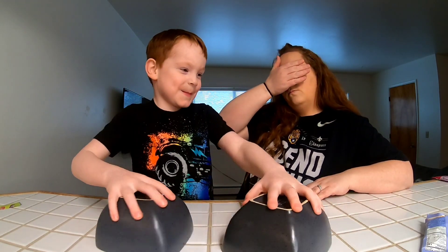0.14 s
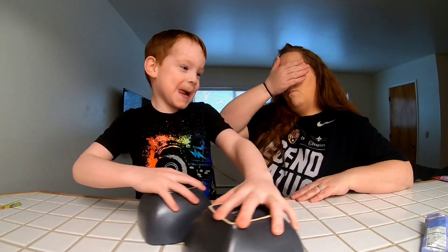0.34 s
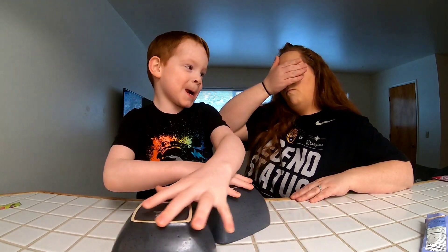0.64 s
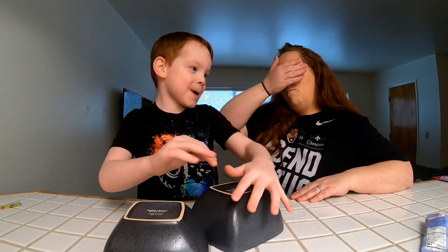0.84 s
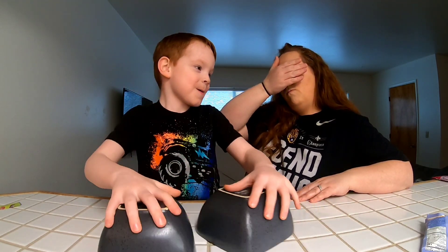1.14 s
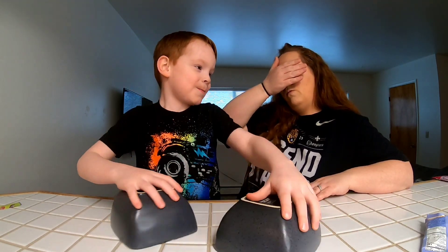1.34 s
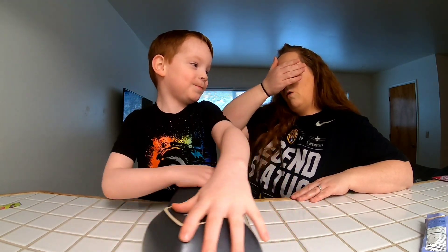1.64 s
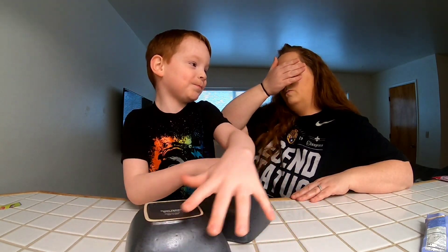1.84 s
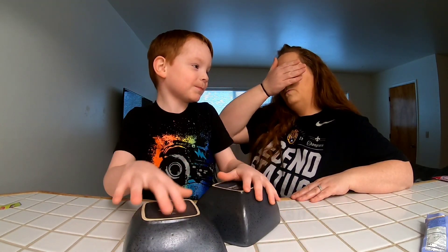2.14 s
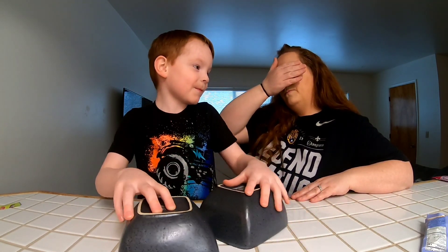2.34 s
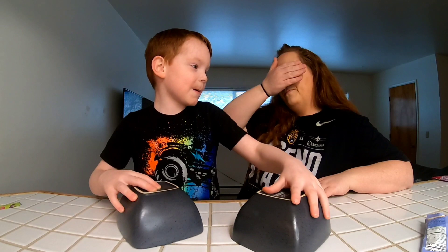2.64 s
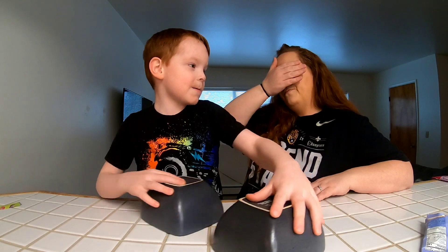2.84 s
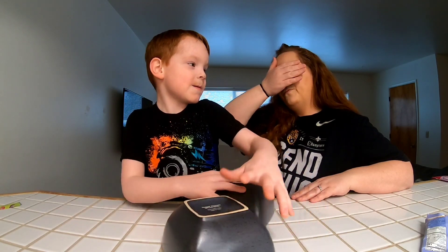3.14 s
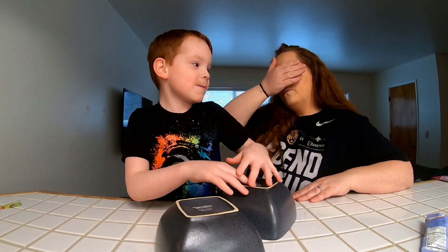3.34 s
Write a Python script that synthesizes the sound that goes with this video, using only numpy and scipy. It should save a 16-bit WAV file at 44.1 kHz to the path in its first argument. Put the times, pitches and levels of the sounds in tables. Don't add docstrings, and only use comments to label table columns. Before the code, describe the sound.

Close view of ceramic bowls pushed rim-down across tile: a quick first shuffle, then two longer ones, gritty scraping mixed with irregular hollow knocks and dull counter thuds, in a lively, quiet kitchen.

```python
import sys
import numpy as np
from scipy import signal
from scipy.io import wavfile
from scipy.ndimage import uniform_filter1d

SR = 44100
rng = np.random.default_rng(int(sys.argv[2]) if len(sys.argv) > 2 else 0)


def store_pcm(level_fs):
    pcm = np.round(np.clip(level_fs, -1, 1) * 32767).astype(np.int16)
    wavfile.write(sys.argv[1], SR, np.atleast_2d(pcm).T)


def field_ratio(decibels):
    return 10 ** (np.asarray(decibels, dtype=float) / 20)


N = 154350

BOWL_ONE_HZ = [1485, 1510, 2590, 4490, 5595, 7023, 8310, 10190, 6655, 3920, 8730]
BOWL_TWO_HZ = [1575, 1605, 2736, 3443, 4760, 5790, 5884, 7219, 8909, 9948, 10640]
COUNTER_HZ = [70, 129, 165, 203]
# level in dB, time to die by 60 dB in seconds.
BOWL_ONE = [(4.5, 0.25), (-3.5, 0.22), (2, 0.15), (-12.5, 0.28), (-12, 0.18), (-17.5, 0.17), (-22.5, 0.32),
            (-15.5, 0.15), (-12, 0.042), (-11.5, .1), (-25, .2)]
BOWL_TWO = [(6.5, 0.2), (-8, 0.27), (6, 0.17), (-4.5, 0.22), (-12, 0.22), (-18.5, 0.21), (-21.5, 0.23),
            (-21, 0.21), (-21, 0.19), (-15, 0.13), (-13.5, 0.16)]
COUNTER = [(-8, 0.31), (-4.5, 0.25), (-6, 0.4), (-6, 0.47)]
# pitch in Hz, level in dB, time to die by 60 dB in seconds.
AIR = [(283.4, -2.5, 0.21), (329, 2, 0.075), (360, 0.5, 0.1), (393, 1.5, 0.11), (425, 5.5, 0.11),
       (470, 3.5, 0.063), (554, -6.5, 0.14)]
# frequency in Hz, level in dB.
RIM_TONE = [(60, -15), (250, -2.5), (500, 2), (1200, 6), (2500, -1.5), (4500, -15), (9000, -33),
            (16000, -27.5)]
# time in seconds, then knock, hollow air, ring and bell tone in dB.
KNOCKS_ONE = [(0.423, -9, -14, -32.5, -23.5), (0.5056, -10, -20.5, -31, -35.5),
              (0.5725, -10.5, -23.5, -26, -21), (0.6036, -7, -17.5, -28, -18),
              (0.642, -11, -20.5, -26, -20), (0.6811, -15, -22, -42, -28), (0.7138, -13.5, -21, -47, -49),
              (1.0942, -13, -18, -39, -60), (1.1655, -17, -26, -36, -61), (1.2446, -35, -37, -37, -48),
              (1.2719, -15, -33, -39, -45), (1.279, -8.5, -20.5, -29.5, -37),
              (1.3007, -20.5, -24.5, -39, -43), (1.335, -18, -27, -35, -48), (1.3549, -8, -27, -34, -41),
              (1.3625, -10, -27, -27, -36), (1.3994, -5, -32, -33, -53), (1.4175, -25, -24, -32, -45),
              (1.5066, -6, -23.5, -34, -62), (1.5452, -5.5, -14, -29.5, -33),
              (1.6215, -11, -13, -36.5, -49), (1.627, -10, -22.5, -41, -48), (1.9933, -11, -19, -36, -55),
              (1.9994, -10, -35, -43, -52), (2.011, -14.5, -20, -45, -31.5), (2.3005, -18, -30.5, -51, -60),
              (2.503, -23.5, -28, -45, -63), (2.5082, -16, -18, -38, -38), (2.552, -8, -19.5, -31, -58),
              (3.048, -7.5, -27, -28, -23)]
# time in seconds, then knock, hollow air and ring in dB.
KNOCKS_TWO = [(0.1403, -6, -19.5, -40), (0.2844, -7.5, -27, -37), (0.3114, -11.5, -33, -45),
              (0.3729, -5.5, -15.5, -34), (0.3914, -14.5, -22.5, -25.5), (0.864, -7.5, -25, -36),
              (0.9044, -11.5, -24, -47), (0.9611, -33.5, -33.5, -49), (1.4859, -13, -21.5, -42.5),
              (1.6814, -12.5, -17, -36), (1.726, -14, -26.5, -45.5), (1.7857, -14, -37, -37),
              (1.8186, -15.5, -21, -60), (1.878, -19.5, -32, -46), (1.906, -22, -34, -46),
              (1.9421, -13.5, -33, -57), (1.9653, -14.5, -29, -41), (2.4171, -15.5, -35, -52.5),
              (2.451, -30.5, -44, -71), (2.5842, -14, -26, -46), (2.627, -12, -21.5, -34),
              (2.643, -11, -17, -44), (2.6852, -9, -27, -33), (2.7882, -7.5, -17.5, -32.5),
              (2.796, -9, -18, -40), (2.9001, -19.5, -40, -35), (2.9135, -10, -17.5, -39),
              (3.0152, -13, -21, -41), (3.021, -14.5, -13.5, -41), (3.3039, -17.5, -17, -41),
              (3.3119, -13.5, -21, -38), (3.3662, -14, -23, -44.5), (3.4328, -35, -32, -52.5),
              (3.453, -44, -37.5, -63)]


def evened(x):
    return x / np.sqrt(np.mean(x ** 2) + 1e-20)


def read(points, hz):
    f, value = np.transpose(points)
    return np.interp(np.log(hz + 1), np.log(f + 1), value)


def colour(x, points):
    log_gain = np.log(field_ratio(read(points, abs(np.fft.fftfreq(4096, 1 / SR)))))
    taps = np.fft.ifft(np.exp(log_gain - 1j * signal.hilbert(log_gain).imag)).real[:2048]
    return signal.oaconvolve(x, taps / np.linalg.norm(taps))[:N]


def clicks(s, strength):
    out = np.zeros(N)
    out[np.round(s * SR).astype(int)] = strength
    return out


def pitched(hz, rows):
    return [(f, *row) for f, row in zip(hz, rows)]


def mode(x, hz, db, t60):
    r = np.exp(-np.log(1000) / (max(t60, 0.01) * SR))
    w = 2 * np.pi * hz / SR
    return field_ratio(db) / 2 * signal.lfilter([1, 0, -1], [1, -2 * r * np.cos(w), r * r], x)


def struck(s, db, modes, spread_db):
    luck = rng.standard_normal((len(s), len(modes), 2))
    out = np.zeros(N)
    for k, row in enumerate(modes):
        strength = field_ratio(db[k] + spread_db * luck[:, k, 0]) * np.sign(luck[:, k, 1])
        out += mode(clicks(s, strength), *row)
    return out


def ringing(s, db, modes):
    spread_db, bloom_s, wobble_db, wobble_rad = 1.5, 0.0017, 4.5, 0.83
    luck = rng.standard_normal((len(s), len(modes)))
    out, t = np.zeros(N), np.arange(N) / SR
    for k, (hz, mode_db, t60) in enumerate(modes):
        energy = clicks(s, field_ratio(2 * (db + mode_db + spread_db * luck[:, k])))
        decay = np.exp(-2 * np.log(1000) / (max(t60, 0.01) * SR))
        energy = signal.lfilter([1], [1, -decay], energy)
        energy = abs(uniform_filter1d(energy, round(bloom_s * SR) + 1))
        wobble = np.interp(t, np.arange(0, 4, 0.01), rng.standard_normal(400))
        wave = np.sin(2 * np.pi * hz * t + wobble_rad * wobble)
        out += np.sqrt(energy) * field_ratio(wobble_db * wobble) * wave
    return out


def tuned(t, hz):
    # time in seconds, pitch in Hz.
    cavity = [(.1, 420), (.3, 360), (.45, 422), (.58, 354), (.7, 282), (.9, 350), (1.1, 412), (1.3, 334),
              (1.5, 306), (1.65, 320), (1.8, 378), (2.0, 337), (2.5, 425), (2.65, 318), (2.95, 330),
              (3.06, 422), (3.25, 335), (3.42, 390)]
    width_hz, depth_db = 51.4, -7.5
    distance = (hz - np.interp(t, *np.transpose(cavity))) / width_hz
    return depth_db * (1 - np.exp(-distance ** 2))


def hush():
    # frequency in Hz, level in dB.
    hush_tone = [(30, -8), (150, -16.5), (500, -1), (2000, -15), (9000, -39.5)]
    level_db = -47
    mid, side = (evened(colour(v, hush_tone)) for v in rng.standard_normal((2, N)))
    return field_ratio(level_db) * np.array([mid + 0.3 * side, mid - 0.3 * side])


def rim_knocks(s, db):
    chatter_s, rise_s, tick_db = 0.0073, 0.00087, 17.5
    blows, t = clicks(s, field_ratio(db)), np.arange(4000) / SR
    swell = np.exp(-t / chatter_s) * (1 - np.exp(-t / rise_s))
    chatter = signal.oaconvolve(blows, swell)[:N] * rng.standard_normal(N)
    roughness_db = 2 * evened(uniform_filter1d(rng.standard_normal(N), size=60))
    return colour(chatter * field_ratio(roughness_db) + field_ratio(tick_db) * blows, RIM_TONE)


def counter_booms(s, hollow_db):
    # time in seconds, boom in dB, deep boom in dB.
    thumps = [(0.136, -25, -39), (0.428, -36, -53), (0.591, -20, -20), (0.873, -23.5, -28),
              (1.101, -44, -33), (1.389, -26, -26), (1.501, -26, -36), (1.545, -21, -35), (1.62, -32, -27),
              (1.757, -29, -21), (1.822, -32, -23), (1.997, -21, -26), (2.511, -41, -42), (2.644, -32, -28),
              (2.791, -17.5, -30), (3.02, -31, -34), (3.069, -16.5, -25), (3.15, -36, -29),
              (3.319, -39.5, -36)]
    knock_db, spread_db, slab_q = -17.5, 3.5, 2.76
    counter = pitched(COUNTER_HZ, COUNTER)
    slab = struck(s, [hollow_db + knock_db] * len(counter), counter, spread_db)
    thump_s, boom_db, deep_db = np.transpose(thumps)
    slab += struck(thump_s, [deep_db, boom_db], counter[:2], 0)
    return sum(signal.lfilter(*signal.iirpeak(hz, slab_q * hz / COUNTER_HZ[0], SR), slab) for hz in COUNTER_HZ)


def hollow_knocks(s, hollow_db):
    air_db, spread_db, contact_s = -5, 3.5, 0.0017
    air = struck(s, [hollow_db + air_db + tuned(s, row[0]) for row in AIR], AIR, spread_db)
    soft = np.hanning(round(contact_s * SR) + 3)
    return signal.oaconvolve(air + counter_booms(s, hollow_db), soft / soft.sum())[:N]


def glaze():
    level_db, t60 = -10, 0.11
    hz = np.sort(rng.uniform(9300, 15300, size=18))
    return [(f, level_db - 20 * np.log2(f / 10000), t60) for f in hz]


def bowl_rings():
    # time in seconds, level in dB.
    shrill_one = [(0.422, -26.5), (.506, -58), (.572, -30), (0.603, -20), (.642, -24.5), (0.713, -31),
                  (1.094, -47), (1.165, -51), (1.277, -33), (1.354, -40), (1.399, -29.5), (1.505, -33.5),
                  (1.547, -32.5), (1.625, -39), (2.011, -36), (2.3, -54), (2.552, -41), (3.047, -29)]
    shrill_two = [(.14, -36), (.285, -30), (.372, -26), (0.866, -29.5), (.905, -36), (1.681, -35),
                  (1.756, -43.5), (1.815, -41.5), (1.879, -47), (1.943, -48), (2.415, -42.5), (2.55, -40.5),
                  (2.628, -50), (2.687, -34), (2.786, -35), (2.914, -45.5), (2.966, -34), (3.305, -35.5),
                  (3.366, -46.5)]
    # level in dB, time to die by 60 dB in seconds.
    bell_hz = [3321]
    bell = [(-5.5, 0.3)]
    ring_db = -1
    high = glaze()
    bowl_one = pitched(BOWL_ONE_HZ, BOWL_ONE) + high[::2]
    bowl_two = pitched(BOWL_TWO_HZ, BOWL_TWO) + high[1::2]
    one, two = np.transpose(KNOCKS_ONE), np.transpose(KNOCKS_TWO)
    ring = ringing(one[0], one[3] + ring_db, bowl_one[:3])
    ring += ringing(one[0], one[4], pitched(bell_hz, bell))
    ring += ringing(two[0], two[3] + ring_db, bowl_two[:3])
    ring += ringing(*np.transpose(shrill_one), bowl_one[3:])
    ring += ringing(*np.transpose(shrill_two), bowl_two[3:])
    return ring


def knocks():
    # time in seconds, knock in dB, hollow air in dB.
    knocks_held = [(0.0034, -13, -24), (0.1252, -14.5, -20.5), (0.5476, -12, -13), (0.8286, -30, -23),
                   (1.7547, -13.5, -18), (2.224, -32.5, -35), (2.364, -30.5, -44), (2.9662, -13.5, -13.5),
                   (3.1735, -14.5, -14.5), (3.285, -21.5, -30)]
    rim_db = -10
    every = [row[:3] for row in KNOCKS_ONE + KNOCKS_TWO + knocks_held]
    s, db, hollow_db = np.transpose(every)
    return field_ratio(rim_db) * rim_knocks(s, db) + hollow_knocks(s, hollow_db) + bowl_rings()


def hand_pressure(t):
    # time in seconds, grind in dB, share of bowl one from 0 to 1.
    shuffles = [
        [(.27, -23.5, 0), (.4, -35.5, 0.45), (.55, -28.5, 0.93), (.7, -33, 0.1), (.77, -37.5, 0.8),
         (.85, -54, 0.5)],
        [(1.08, -53, 0.6), (1.25, -34, .9), (1.4, -33, 1), (1.6, -29.5, 0.9), (1.8, -34.5, 0.2),
         (2.0, -39, 0.4)],
        [(2.4, -38.5, 0.4), (2.55, -28, 0.54), (2.75, -28.5, 0), (3.1, -29.5, 0.04), (3.25, -36.5, 0.3),
         (3.5, -42.5, 0.4)],
    ]
    start_s, stop_s = 0.0058, 0.012
    press, one = np.zeros((2, N))
    for rows in shuffles:
        s, db, share = np.transpose(rows)
        on = np.clip((t - s[0]) / start_s, 0, 1) * np.clip((s[-1] - t) / stop_s, 0, 1)
        press += on * field_ratio(np.interp(t, s, db))
        one += (on > 0) * np.clip(np.interp(t, s, share), 0, 1)
    return press, one


def grit_clicks():
    grits_per_s, spread_db, lump_db, lump_s = 970, 6.5, 1, 0.022
    slow = uniform_filter1d(rng.standard_normal(N), round(lump_s * SR))
    lumps = field_ratio(lump_db * evened(uniform_filter1d(slow, 200)))
    size = field_ratio(spread_db * np.minimum(rng.exponential(1, N), 4))
    grit = (rng.random(N) < grits_per_s / SR) * size
    return evened(lumps * grit * rng.choice([-1., 1.], N))


def slides():
    grind_db, air_db, ring_db, rumble_db = -3.5, -3, -10.5, -28.5
    tilt_db = -5
    t = np.arange(N) / SR
    press, one = hand_pressure(t)
    grit = grit_clicks()

    def body(drives, modes):
        driven = sum(mode(drive * grit, *row) for drive, row in zip(drives, modes))
        return driven / np.std(sum(mode(grit, *row) for row in modes))

    grind_tone = [(f, db + tilt_db * np.log2(f / 1000)) for f, db in RIM_TONE]
    air = body([press * field_ratio(tuned(t, row[0])) for row in AIR], AIR)
    rumble = body([press] * len(COUNTER), pitched(COUNTER_HZ, COUNTER))
    ring = body([press * one] * len(BOWL_ONE), pitched(BOWL_ONE_HZ, BOWL_ONE))
    ring += body([press * (1 - one)] * len(BOWL_TWO), pitched(BOWL_TWO_HZ, BOWL_TWO))
    grind = field_ratio(grind_db) * colour(press * grit, grind_tone)
    return grind + field_ratio(air_db) * air + field_ratio(rumble_db) * rumble + field_ratio(ring_db) * ring


def room(x):
    # frequency in Hz, time to die by 60 dB in seconds.
    decay = [(60, 0.39), (1000, 0.41), (9000, 0.33)]
    # frequency in Hz, level in dB.
    mid_tone = [(60, -19), (200, -3.5), (350, 2), (2000, -2)]
    side_tone = [(60, -16.5), (300, -24), (700, -1.5), (1400, -0.5), (3000, -8.5), (8000, 1.5)]
    taps = np.zeros((2, SR // 2))
    at = np.arange(80, SR // 2 - 20, 20)
    shape = (2, len(at))
    np.put_along_axis(taps, at + rng.integers(0, 20, shape), rng.choice([-1., 1.], shape), 1)
    hz, t, z = signal.stft(taps, SR, nperseg=512)
    z = z * field_ratio(-60 * t / read(decay, hz)[:, None])
    size = np.linalg.norm(signal.istft(z, SR, nperseg=512)[1], axis=1).mean()
    z = z / size * field_ratio(np.array([read(mid_tone, hz), read(side_tone, hz)]))[:, :, None]
    tail = signal.istft(z, SR, nperseg=512)[1]
    mid, side = signal.fftconvolve(x[None], tail, axes=1)[:, :N]
    return np.array([mid + side, mid - side])


def scene():
    left_db = -0.8
    bowls = knocks() + slides()
    return (bowls + room(bowls) + hush()) * field_ratio(np.array([[left_db], [-left_db]]))


def low_pass(x):
    return signal.sosfilt(signal.butter(12, 15450, fs=SR, output="sos"), x)


def record(dry):
    edge_hz, above_edge_db = 9050, -27
    dry = signal.sosfilt(signal.butter(4, 56, "high", fs=SR, output="sos"), dry)
    edge = signal.firwin(401, edge_hz, window=("kaiser", 8), fs=SR)
    low = signal.oaconvolve(dry, edge[None], "same")
    return low_pass(low + field_ratio(above_edge_db) * (dry - low))


dry = scene()
out = record(dry)
store_pcm(out)
```